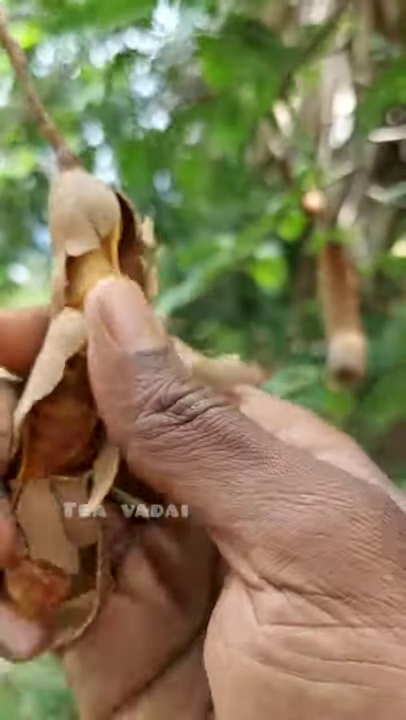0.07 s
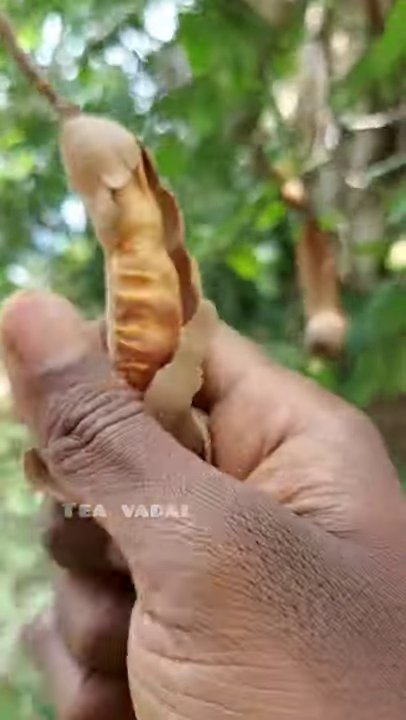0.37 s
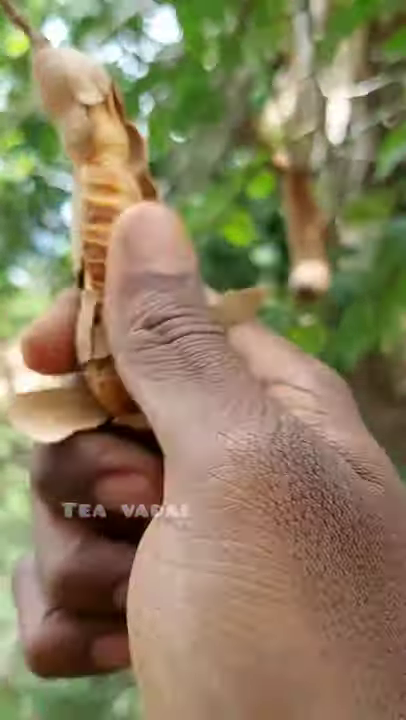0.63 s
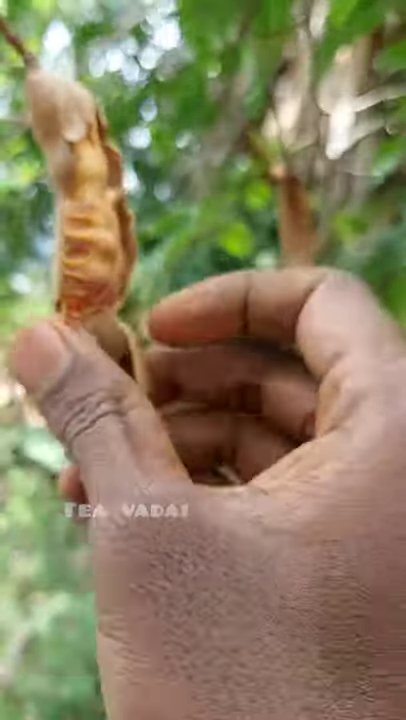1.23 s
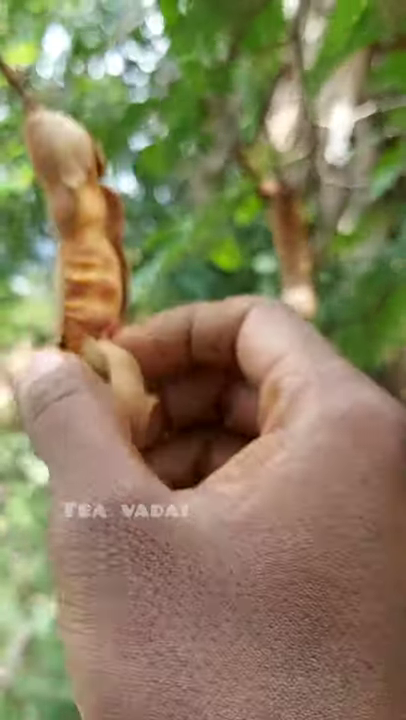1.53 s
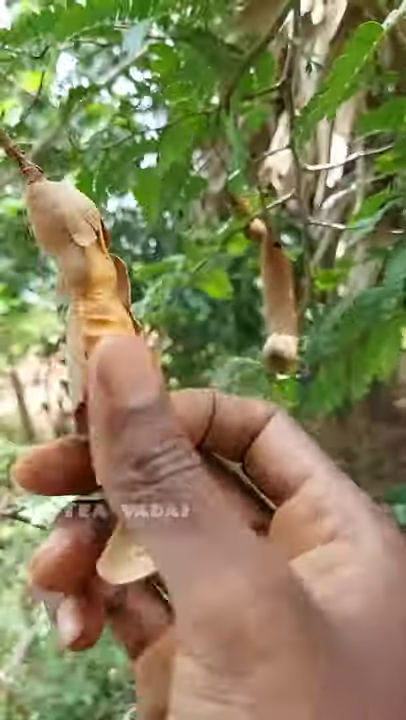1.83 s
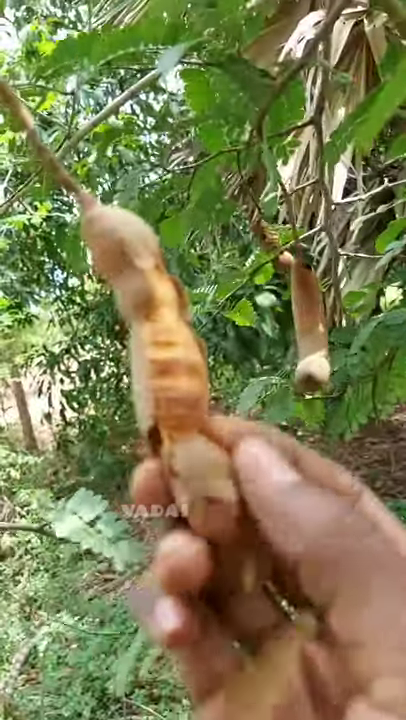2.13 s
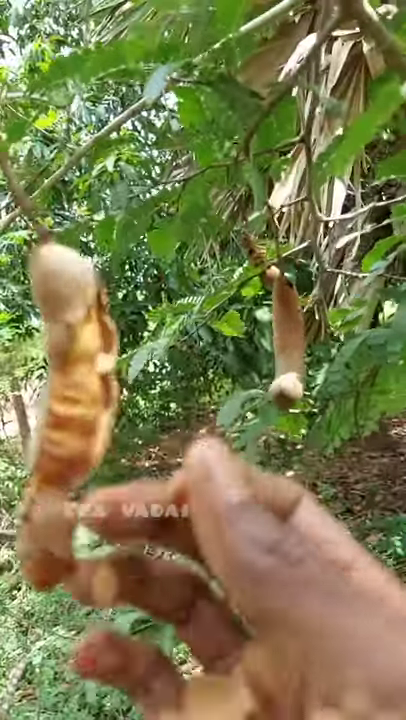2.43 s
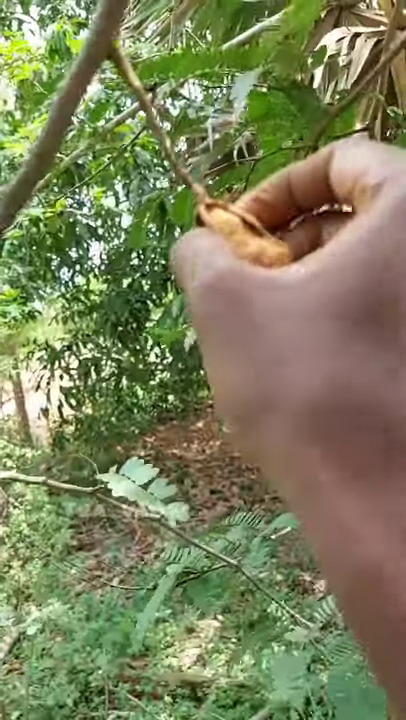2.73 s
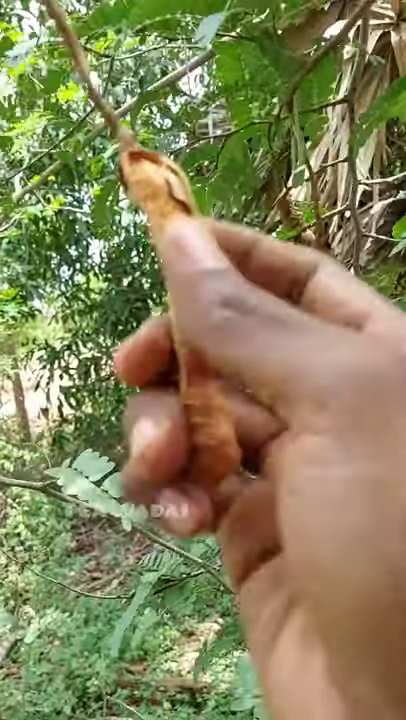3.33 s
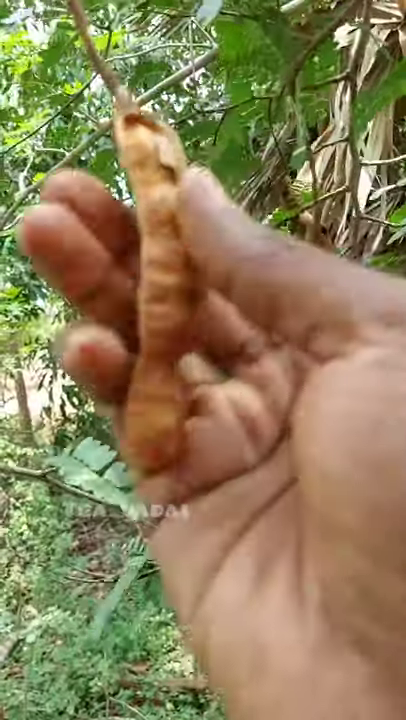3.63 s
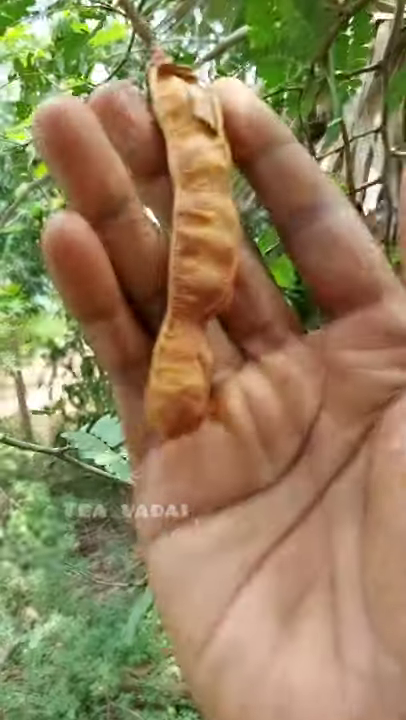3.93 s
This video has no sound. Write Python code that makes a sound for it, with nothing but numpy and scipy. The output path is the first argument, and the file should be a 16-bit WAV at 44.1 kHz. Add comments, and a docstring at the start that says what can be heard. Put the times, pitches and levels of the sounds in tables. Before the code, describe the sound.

A dry pod shell cracks close by, with a loud split at about 0.2 seconds, then small snaps and papery rubbing as fingers peel it. The loudest snap comes at 2.1 seconds, followed by a faint, shrill squeak and a soft pop near 2.5. Only a few faint ticks follow. Throughout the four seconds, wind rumbles on the microphone with dull finger bumps, while distant birds call faintly.

```python
"""Fingers crack and peel the dry shell of a pod hanging on a tree, close to the microphone. From the start wind
buffets the microphone, and birds call far off over a faint hiss of leaves. At 0.23 s a loud split rings the
brittle shell's modes; small snaps, rubbing flakes and thuds follow. The loudest snap comes at 2.1 s, then a
shrill squeak; a soft pop follows at 2.5 s. After that the shell gives only a few faint ticks and rubs, while
thuds, gusts and birds go on."""
import sys
import numpy as np
from scipy import signal
from scipy.fft import rfft, irfft, next_fast_len
from scipy.io import wavfile
from scipy.ndimage import uniform_filter1d, map_coordinates

SR = 44100
rng = np.random.default_rng(int(sys.argv[2]) if len(sys.argv) > 2 else 0)


def master(y):
    """Save y as 16-bit WAV."""
    cut = np.clip(np.atleast_2d(y).T, -1, 1)
    pcm = np.round(cut * 32767)  # scale
    wavfile.write(sys.argv[1], SR, pcm.astype(np.int16))


N = 176400

# breaks (time [s], peak of the ring [dB], pitch [Hz], splinter noise relative to the ring [dB])
FRACTURES = [(0.0521, -33.5, 3700, -0.5), (0.0654, -26.5, 3500, 3.5), (0.0665, -29, 7150, -12.5),
             (.0904, -41, 3680, -11.5), (0.2387, -31, 4800, 11.5), (0.242, -21.5, 5900, 8.5),
             (0.3212, -35.5, 2870, -25), (0.6291, -40, 6050, -1), (0.6964, -25.5, 5630, -13.5),
             (0.733, -28, 5600, -22), (0.7665, -39.5, 7450, -4), (0.829, -35, 5920, -31),
             (0.8565, -29.5, 6260, -14), (.9842, -37.5, 6040, -14), (1.0113, -27, 5920, -23),
             (1.2073, -40.5, 5770, -5), (1.3434, -39.5, 6620, -2), (1.4373, -26.5, 6000, -7),
             (1.4568, -43, 7600, 1), (1.4998, -41, 5250, 8.5), (1.529, -41.5, 2570, -5),
             (1.5543, -42, 3700, -14), (1.9701, -36.5, 4200, -3.5), (1.9767, -36.5, 7470, 0.5),
             (1.9899, -40, 3820, -2), (2.098, -1.5, 6900, -12.5), (2.112, -25.5, 3300, -8),
             (2.1233, -25.5, 3730, -2.5), (2.1268, -32, 7600, 7), (2.1434, -32.5, 2250, -16.5),
             (2.174, -40, 4850, -11.5), (2.8993, -47.5, 8900, -3.5), (2.9198, -39, 8970, -5)]
# stages of the first loud break, running across the pod (columns as above, then left minus right [dB])
SPLIT_STAGES = [(.2305, -15.5, 5250, -4, -16), (.2321, -4.5, 4854, -22.5, 0),
                (.2326, -13.5, 4720, -22, -9.5)]
# modes of a piece of shell (frequency [x pitch], level [dB], decay time [x ring time])
SHELL_MODES = [(.5, -26, 0.81), (.8, -1, 1.9), (1, 8.5, 1.4), (1.07, -2.5, 0.97), (1.261, -3.5, 1.6),
               (1.421, -9.5, 0.65), (1.73, -5, 1), (2.06, -8.5, 0.87)]
# splinter spectrum (frequency [Hz], density [dB])
SPLINTER_SPECTRUM = [(200, -18.5), (600, -1), (1100, -15.5), (2200, -4), (3600, -4.5), (7000, 2.5),
                     (10000, 5), (15500, -13.5)]
def snaps(ring_t60_s=0.003, splinter_t60_s=0.0044, rise_s=0.00033):
    """Brittle fracture: each break sets off damped modes of the shell and a burst of splinter noise."""
    out, t = np.zeros((2, N)), np.arange(1024) / SR
    highpass = signal.butter(2, 1300, "high", fs=SR, output="sos")
    centred = [(*row, 0) for row in FRACTURES]
    for start, db, hz, splinter_db, pan_db in centred + list(SPLIT_STAGES):
        ring = sum(amp(level - 60 * t / (ring_t60_s * share)) * np.sin(2 * np.pi * hz * ratio * t)
                   for ratio, level, share in SHELL_MODES if hz * ratio < SR / 2)
        ring *= 1 - np.exp(-(t / rise_s) ** 2)
        burst = colour(rng.standard_normal(len(t)), SPLINTER_SPECTRUM)
        burst *= amp(-60 * t / splinter_t60_s) * (1 - np.exp(-t / rise_s))
        ring, burst = signal.sosfilt(highpass, [ring, burst])
        ring /= abs(ring).max()
        snap = amp(db) * (ring + amp(splinter_db) * unit(burst) * ring.std())
        right = snap * 2 / (1 + amp(pan_db))
        add(out[0], start, right * amp(pan_db))
        add(out[1], start, right)
    return out


# finger strokes (time [s], duration [s], level [dB], low cutoff [Hz], tilt [dB/octave])
STROKES = [(0, 0.044, -55, 3170, -3.5), (0.052, 1.7, -75, 3500, 2.5), (0.136, 0.025, -61, 3420, -1),
           (0.228, 0.048, -45, 2603, -1), (0.264, 0.14, -53.5, 3200, 0.5), (0.472, 0.135, -54.5, 3000, 0.5),
           (0.615, 0.16, -56.5, 2820, 0.5), (0.706, 0.039, -51, 2640, 2.5), (0.823, 0.049, -56, 4600, -2),
           (0.884, 0.19, -69.5, 4840, -6.5), (0.958, 0.081, -58, 4200, -4), (1.047, .095, -62.5, 3800, -3),
           (1.208, 0.038, -63.5, 5460, -5), (1.341, 0.066, -65, 5200, -3), (1.438, 0.12, -64.5, 3500, -5),
           (1.582, 0.081, -56.5, 5200, 0.5), (1.67, 0.053, -63, 5200, -0.5), (1.877, 0.045, -54, 4400, 0),
           (1.935, 0.087, -55, 3304, -2), (2.047, 0.045, -59.5, 3494, -1.5),
           (2.099, 0.018, -54.5, 1800, -1), (2.124, 0.078, -63.5, 2150, -8), (2.194, .1, -67.5, 3240, -2),
           (2.301, 0.012, -59.5, 2160, -1), (2.332, 0.1, -68.5, 3000, -7.5),
           (2.422, 0.095, -65, 2903, -1.5), (2.907, 0.033, -69.5, 5030, -2.5),
           (3.578, 0.058, -70.5, 5340, -4), (3.733, 0.037, -70.5, 6000, -2)]
# spectrum of rubbed shell (frequency [Hz], density [dB])
RUB_SPECTRUM = [(1000, -1), (2500, -2), (4000, -6.5), (5400, 1.5), (7000, -5.5), (8200, -5), (9800, -1.5),
                (11500, -14.5), (14500, -7.5), (16000, -21)]
def rubs(grains_per_s=1200, crackles_per_s=110, overlap_s=0.014):
    """Shot noise: tiny fractures and stray crackles join the hiss of dry friction under each stroke."""
    out = np.zeros(N)
    for start, length, db, low_hz, tilt_db in STROKES:
        length += 2 * overlap_s
        t = np.arange(0, length, 1 / SR)
        chance = rng.random(N)[:len(t)]
        size = rng.exponential(1, N)[:len(t)]
        hiss = rng.standard_normal(N)[:len(t)]
        grains = (chance < grains_per_s / SR) * amp(-0.5 * np.minimum(size, 4)) * np.sign(hiss)
        crackles = (chance > 1 - crackles_per_s / SR) * amp(20) * np.minimum(size, 2)
        judder = amp(2.5 * wander(t, 120))

        def stroke_filter(hz):
            """A leaky high-pass with a tilted, uneven passband."""
            highpass = amp(-18) + 1 / np.sqrt(1 + (low_hz / hz) ** 12)
            octaves = np.log2(np.maximum(hz / low_hz, 1))
            return highpass * amp(tilt_db * octaves + 2 * wander(hz, .0008))

        rub = colour((unit(grains) + 0.5 * hiss + crackles) * judder, RUB_SPECTRUM, stroke_filter)
        swell = np.sin(np.pi * t / length) ** 0.7
        add(out, start - overlap_s / 2, amp(db) * unit(rub * swell))
    return out


# a nail catches and the shell sings in a narrow band (time [s], duration [s], level [dB], pitch [Hz])
NAIL_SCRAPES = [(.52, .065, -68, 4920), (1.07, .075, -62.5, 4650), (1.88, .052, -52, 9120),
                (2.298, .024, -56, 6900)]
# loose shell knocks dully on the fingers (time [s], duration [s], level [dB], pitch [Hz])
SHELL_KNOCKS = [(.668, 0.044, -69, 583), (.83, 0.05, -58.5, 602), (1.49, 0.031, -61.5, 580),
                (1.592, 0.023, -65, 664)]
def scuffs(slips, width_oct, skirt_db):
    """Forced resonance: short, juddering slips drive one band, at skirt_db two widths off centre."""
    out = np.zeros(N)
    for start, length, db, hz in slips:
        t = np.arange(0, length, 1 / SR)
        friction = rng.standard_normal(SR)[:len(t)] * amp(2.5 * wander(t, 200))
        band = [(hz * 2 ** (k * width_oct), skirt_db * (abs(k) / 2) ** .8) for k in range(-8, 9)]
        add(out, start, amp(db) * unit(colour(friction, band) * np.sin(np.pi * t / length)))
    return out


# overlapping notes (time [s], duration [s], first pitch [Hz], last pitch [Hz],
# relative level [dB], second harmonic [dB], waver [x pitch])
SQUEAK_NOTES = [(2.413, .045, 4750, 4770, -51, 2, .004), (2.45, .09, 4770, 4740, -53, -7, .005),
                (2.44, .045, 4800, 4400, -55, -3, .012)]
def squeak(gain_db=2.5):
    """Random modulation: fast jitter in pitch and level roughens shrill notes of three harmonics."""
    out = np.zeros(N)
    for start, length, first_hz, last_hz, db, octave_db, waver in SQUEAK_NOTES:
        t = np.arange(0, length, 1 / SR)
        hz = np.linspace(first_hz, last_hz, len(t)) * (1 + waver * wander(t, 700))
        phase = 2 * np.pi * np.cumsum(hz) / SR
        tone = np.sin(phase) + amp(octave_db) * np.sin(2 * phase) + amp(-24) * np.sin(3 * phase)
        rough = unit(tone * amp(3.1 * wander(t, 206)))
        add(out, start, amp(gain_db + db) * rough * fade(t, 0.0033, 0.054))
    return out


def pop(start_s=2.5395, decay_s=0.00069):
    """A critically damped pulse: one soft pop at 2.54 s."""
    out, age = np.zeros(N), np.arange(1024) / SR / decay_s
    add(out, start_s, amp(-42) * (1 - age) * np.exp(-age))
    return out


# fingers bump the pod and the microphone's body (time of peak [s], peak level [dB], pitch [Hz])
FINGER_BUMPS = [(0.148, -13, 83), (0.668, -20, 80.6), (.748, -18, 71.4), (.858, -16.5, 103),
                (.935, -17, 128), (1.108, -13.5, 98.7), (1.144, -13, 115), (1.81, -13, 70),
                (2.315, -19.5, 79), (3.26, -23, 118.2), (3.842, -21, 120.7)]
def bumps(sigma_cycles=0.6):
    """Soft impact: a slow contact holds only low frequencies, here a tone under a Gaussian window."""
    out, t = np.zeros(N), np.arange(-2048, 2048) / SR
    for peak_s, db, hz in FINGER_BUMPS:
        window = np.exp(-.5 * (t * hz / sigma_cycles) ** 2)
        add(out, peak_s + t[0], amp(db) * np.cos(2 * np.pi * hz * t) * window)
    return out


# gusts (time [s], rumble level [dB], relative flutter level [dB])
GUSTS = [(0, -29, -64.5), (.15, -27.5, -48), (0.299, -24, -51), (0.498, -42, -83), (0.657, -30.5, -49.5),
         (.8, -36, -54), (0.933, -27.5, -43.5), (1.019, -31.5, -54), (1.117, -20.5, -34),
         (1.311, -23.5, -49), (1.451, -41.5, -67.5), (1.529, -20, -45), (1.688, -29, -59.5),
         (1.927, -22.5, -43.5), (2.309, -31, -62), (2.508, -34.5, -66.5), (2.58, -64.5, -88),
         (2.648, -34.5, -60), (2.799, -40.5, -68), (3.11, -45.5, -72.5), (3.199, -27.5, -50),
         (3.33, -29.5, -60), (3.701, -24, -52.5), (4, -23.5, -48)]
# spectra of the deep rumble and the flutter above it (frequency [Hz], density [dB])
RUMBLE_SPECTRUM = [(10, -28), (25, -19), (40, -1), (55, 2), (85, 1.5), (125, -5.5), (170, -19.5),
                   (240, -39.5), (400, -76.5)]
FLUTTER_SPECTRUM = [(60, -14), (130, 2), (185, 7), (260, -6.5), (350, -16.5), (500, -29), (800, -55),
                    (1500, -60.5), (4000, -75)]
def wind(flutter_gain_db=7):
    """Turbulence: eddies at the microphone make a rumble and a lumpy flutter that follow the gusts."""
    t = np.arange(N) / SR
    times, rumble_db, flutter_db = np.transpose(GUSTS)
    rumble = colour(rng.standard_normal(N), RUMBLE_SPECTRUM)
    rumble /= np.sqrt(uniform_filter1d(rumble ** 2, size=4000))  # steadied, so the gusts set its level
    rumble *= amp(np.interp(t, times, rumble_db))
    flutter = unit(colour(rng.standard_normal(N), FLUTTER_SPECTRUM) * amp(5 * wander(t, 45)))
    return rumble + flutter * amp(flutter_gain_db + np.interp(t, times, flutter_db))


def whistle(t, hz, octave_db, waver):
    """Random modulation: a bird's tone and its octave waver in pitch and flicker in level."""
    phase = 2 * np.pi * np.cumsum(hz * (1 + waver * wander(t, 250))) / SR
    tone = np.sin(phase) + amp(octave_db) * np.sin(2 * phase)
    return unit(tone * amp(4.5 * wander(t, 71))) * fade(t, .015, 0.067)


# one bird's calls (time [s], pitch [Hz], relative level [dB])
CALLS = [(0.071, 2356, -57), (1.261, 2238, -60.5), (2.13, 2302, -59), (3.7, 2178, -67.5)]
# the call's two notes (time into the call [s], frequency [x pitch], relative level [dB])
RISING_CONTOUR = [(0, 1, -16), (.05, .99, -13.5), (.15, 1.01, -13), (.2, 1.09, -1.5), (.26, 1.17, -18.5)]
FALLING_CONTOUR = [(.25, 0.81, -14.5), (.3, 0.87, -6), (.33, 0.74, -0.5), (.37, .74, -6.5), (.42, 1, -41.5)]
# other birds (time [s], duration [s], first and last pitch [Hz], relative level [dB], waver [x pitch])
HIGH_WHISTLES = [(.75, .55, 6980, 6880, -70, .004), (2.68, .25, 4980, 5150, -81, .02),
                 (3.04, .55, 7200, 7060, -78, .004), (3.545, .075, 4750, 5550, -74, .012)]
def birds():
    """Frequency glides: one bird repeats a two-note call; others add thin, high whistles."""
    out = np.zeros(N)
    for start, hz, db in CALLS:
        for contour, octave_db, waver in ((RISING_CONTOUR, -23.5, 0.021), (FALLING_CONTOUR, -0.5, 0.018)):
            times, bend, level = np.transpose(contour)
            onset = times[0]
            t = np.arange(0, times[-1] - onset, 1 / SR)
            note = whistle(t, hz * np.interp(t + onset, times, bend), octave_db, waver)
            add(out, start + onset, amp(db + np.interp(t + onset, times, level)) * note)
    for start, length, first_hz, last_hz, db, waver in HIGH_WHISTLES:
        t = np.arange(0, length, 1 / SR)
        glide = np.linspace(first_hz, last_hz, len(t))
        add(out, start, amp(db) * whistle(t, glide, octave_db=-36, waver=waver))
    return out


# spectrum of distant leaves (frequency [Hz], density [dB])
LEAF_SPECTRUM = [(200, 14), (600, 0), (1200, -7.5), (2500, -7), (4400, -15.5), (5200, 1.5), (7000, -2),
                 (9700, -2), (11500, -16), (15500, -29.5)]
def leaves():
    """Incoherent sum: many distant leaves merge into a steady hiss."""
    return amp(-70.5) * colour(rng.standard_normal(N), LEAF_SPECTRUM)


def grove(x, t60_s, echoes_per_s=3000):
    """Scattering: trunks and leaves return sparse echoes that decay exponentially."""
    t = np.arange(SR // 2) / SR
    echoes = rng.standard_normal(len(t)) * (rng.random(len(t)) < echoes_per_s / SR)
    echoes *= amp(-60 * t / t60_s) * (t > .003)
    return signal.fftconvolve(x, echoes / np.linalg.norm(echoes))[:N]


def amp(db):
    """Decibels to gain."""
    return 10 ** (np.asarray(db) / 20)


def unit(x):
    """Normalisation to rms 1."""
    return x / np.sqrt(np.mean(x ** 2) + 1e-20)


def add(mix, start_s, sound):
    """Superposition of a sound on the mix."""
    part = mix[max(round(start_s * SR), 0):][:len(sound)]
    part += sound[:len(part)]


def colour(x, points, shape=lambda hz: 1):
    """Spectral shaping by (frequency [Hz], level [dB]) points and an optional gain curve; rms 1."""
    size = next_fast_len(len(x) + 512)
    hz = np.fft.rfftfreq(size, 1 / SR) + 1
    point_hz, db = np.transpose(points)
    gain = amp(np.interp(np.log(hz), np.log(point_hz), db)) * shape(hz)
    return unit(irfft(rfft(x, size) * gain, size)[:len(x)])


def wander(t, rate):
    """Smooth random curve of about unit size."""
    return map_coordinates(rng.standard_normal(4096), [t * rate], order=3, mode="wrap")


def fade(t, attack_s, release_s):
    """Envelope with a quarter-sine rise and fall."""
    rise = np.sin(np.pi / 2 * np.minimum(t / attack_s, 1))
    return rise * np.sin(np.pi / 2 * np.minimum((t[-1] - t) / release_s, 1))


def scene():
    """Superposition of shell, hand, birds, leaves and wind; only the first split leaves the centre."""
    shell = snaps() + rubs() + scuffs(NAIL_SCRAPES, width_oct=0.17, skirt_db=-22)
    calls = birds()
    hand = bumps() + scuffs(SHELL_KNOCKS, width_oct=0.42, skirt_db=-20)
    far = amp(-7.5) * calls + amp(-1) * grove(calls, t60_s=.3) + leaves()
    shell_echo = amp(-24.5) * grove(shell.mean(0), t60_s=0.51)
    return shell + shell_echo + hand + squeak() + pop() + far + wind()


def record(dry, cutoff_hz=16100):
    """Band limiting: the ends are faded and a linear-phase low-pass removes the highest treble."""
    faded = dry * fade(np.arange(N) / SR, .008, .008)
    padded = np.pad(faded, ((0, 0), (127, 127)), mode="edge")
    lowpass = signal.firwin(255, cutoff_hz, window=("kaiser", 8), fs=SR)
    return signal.oaconvolve(padded, lowpass[None], "valid")


dry = scene()
out = record(dry)
master(out)
```